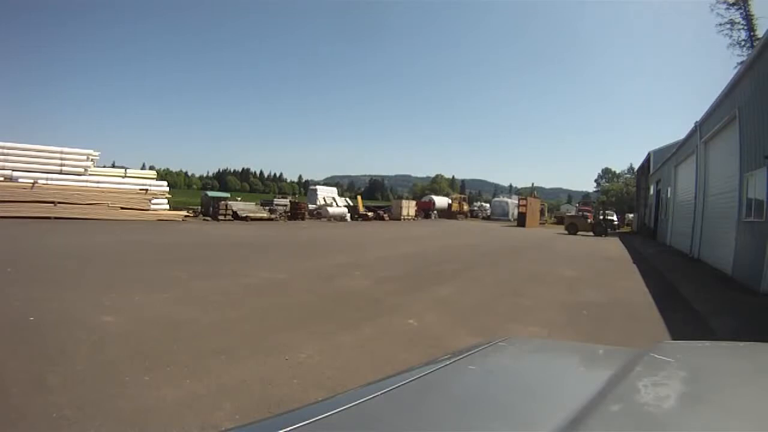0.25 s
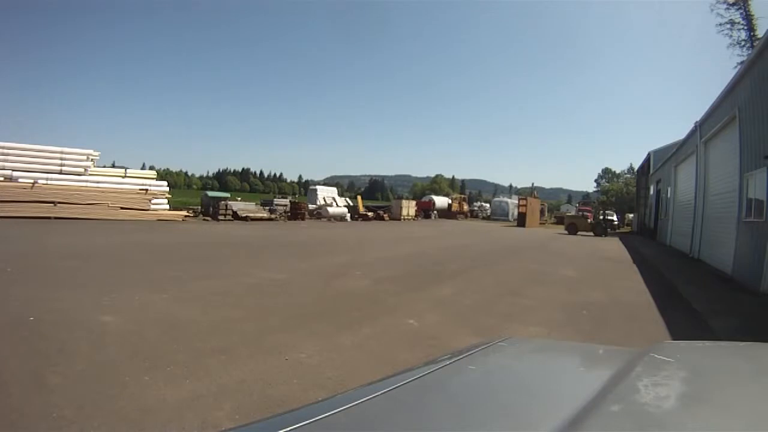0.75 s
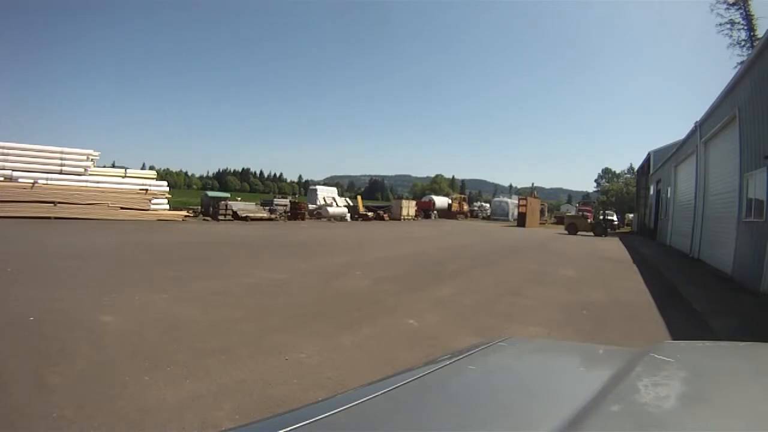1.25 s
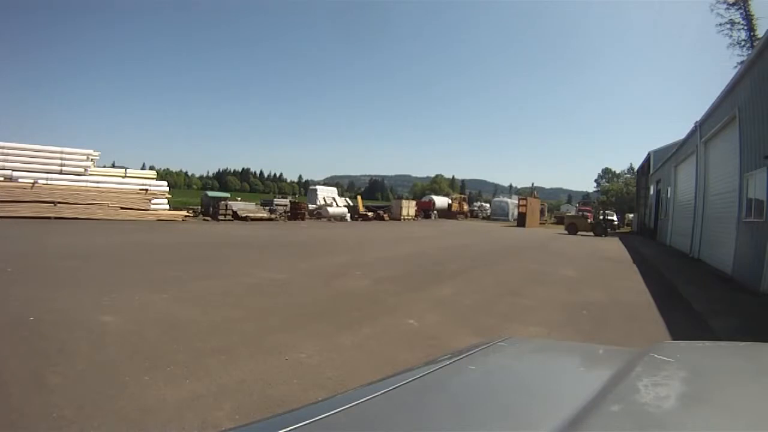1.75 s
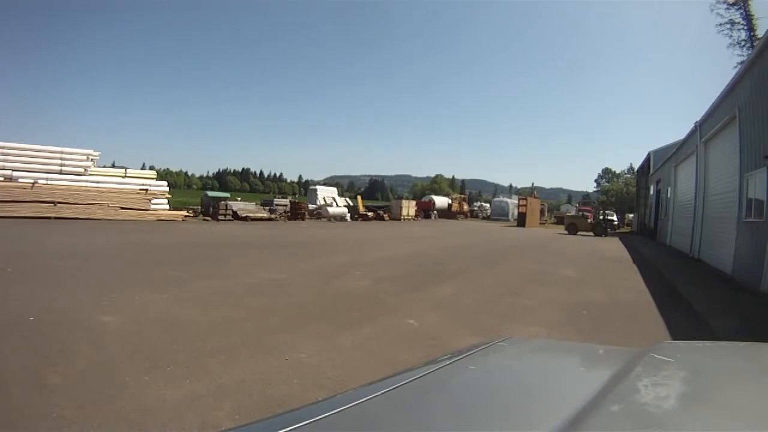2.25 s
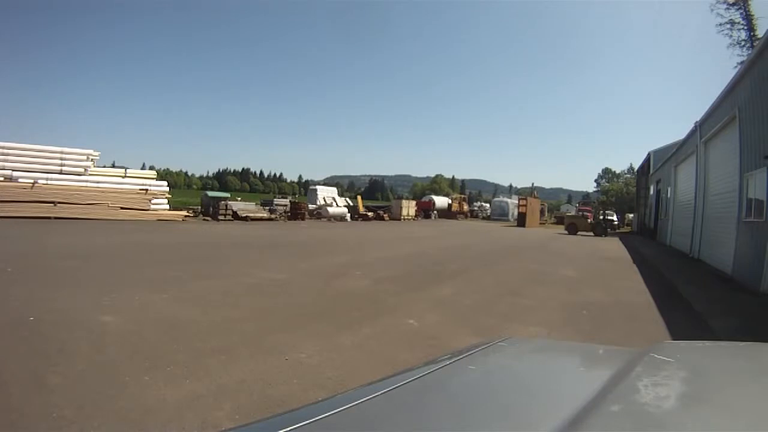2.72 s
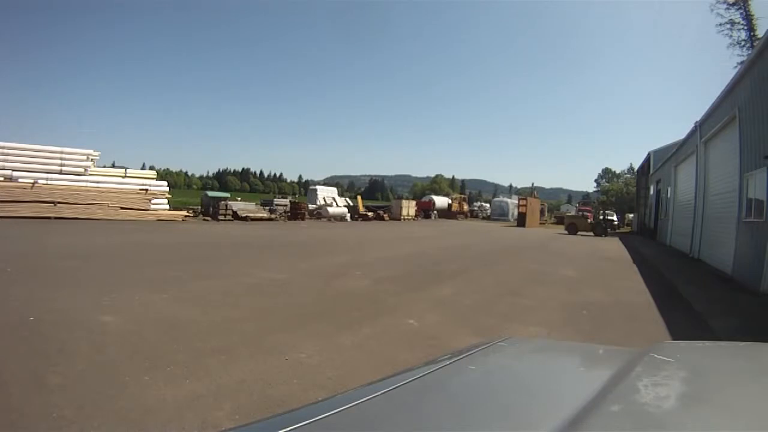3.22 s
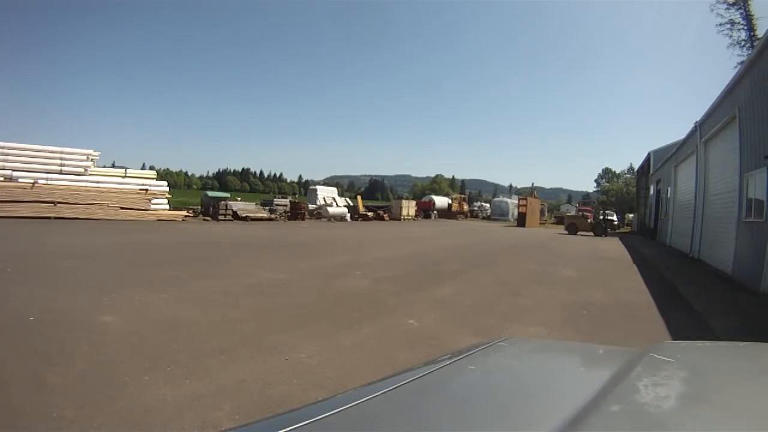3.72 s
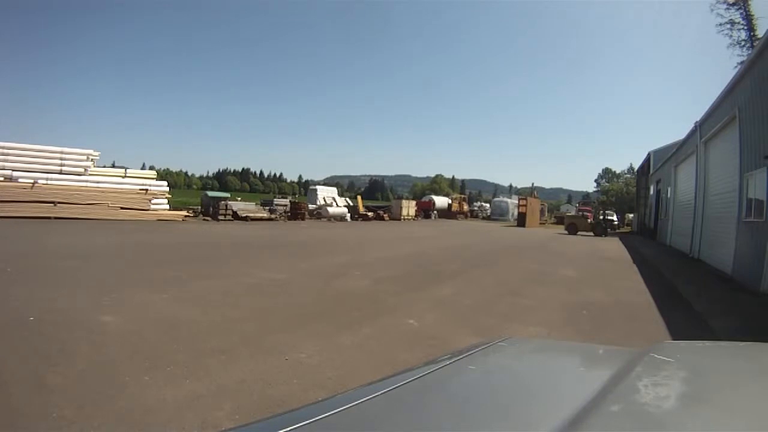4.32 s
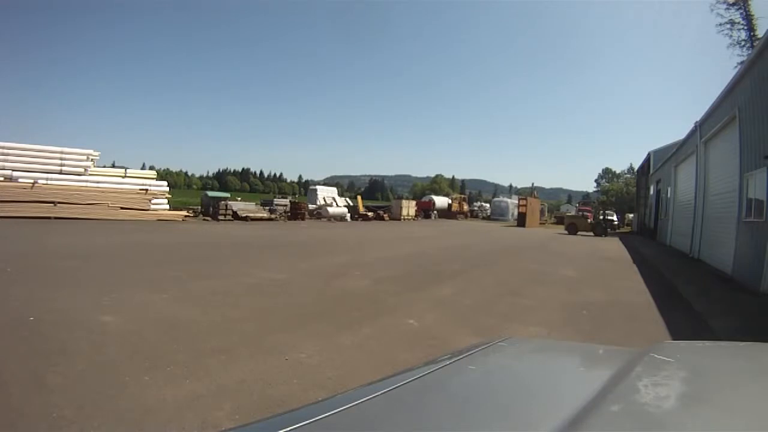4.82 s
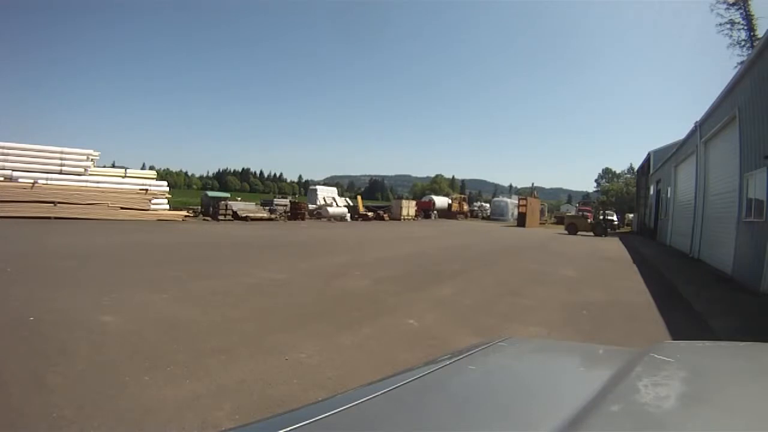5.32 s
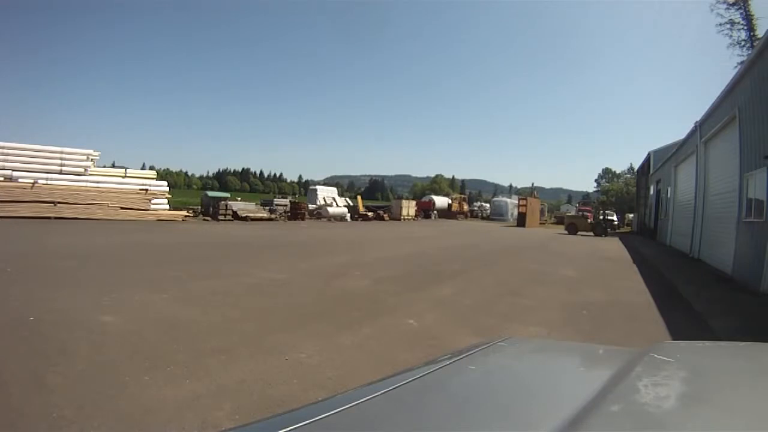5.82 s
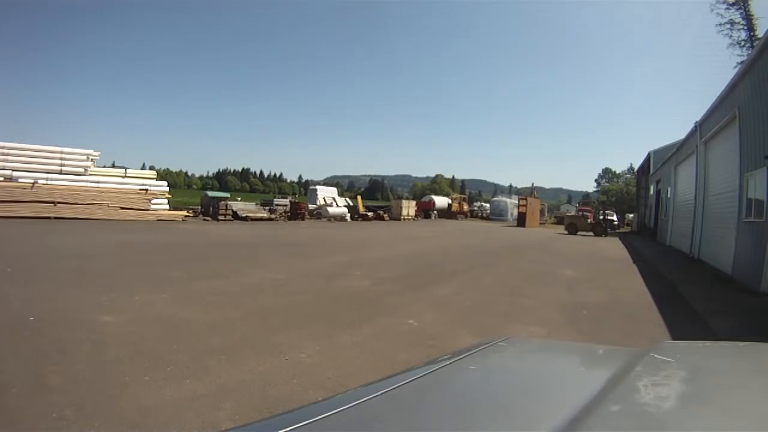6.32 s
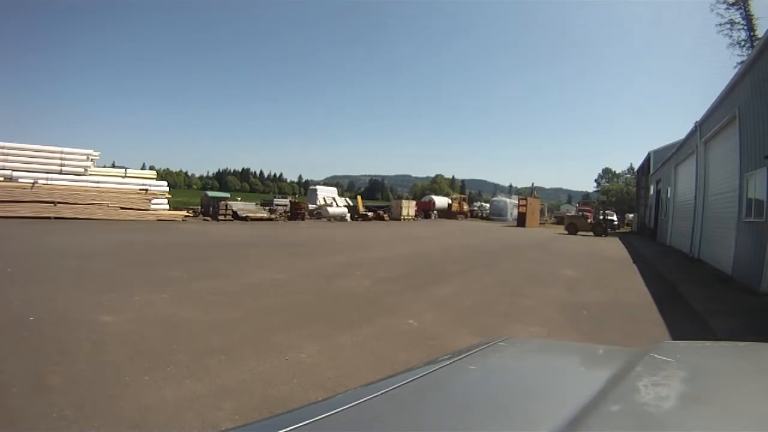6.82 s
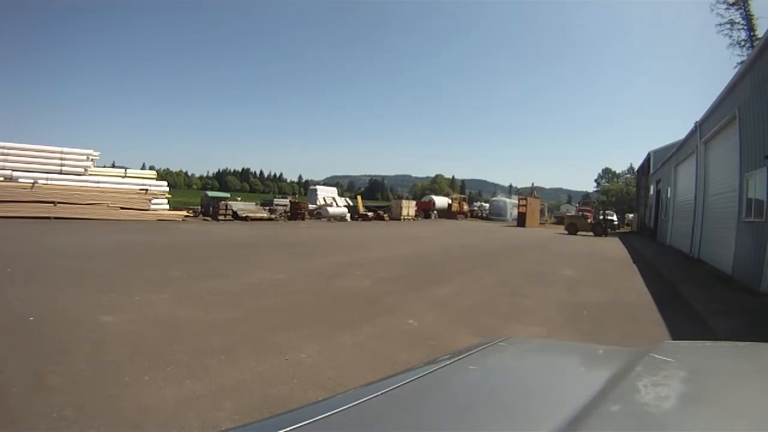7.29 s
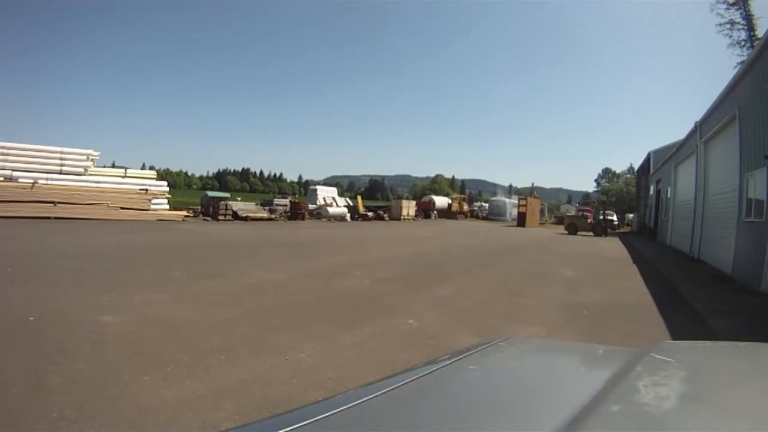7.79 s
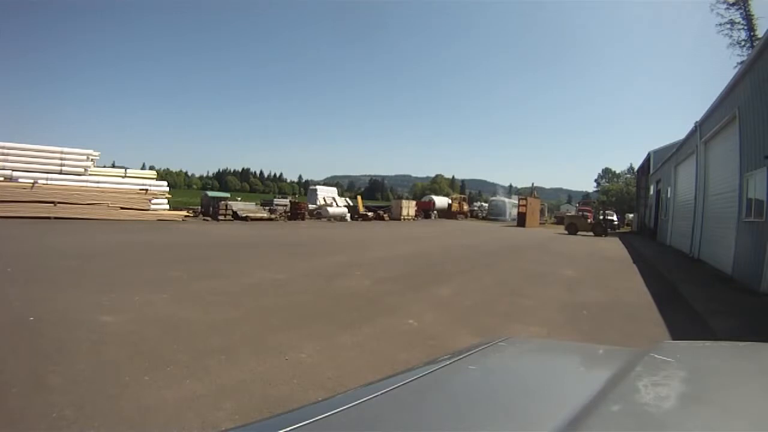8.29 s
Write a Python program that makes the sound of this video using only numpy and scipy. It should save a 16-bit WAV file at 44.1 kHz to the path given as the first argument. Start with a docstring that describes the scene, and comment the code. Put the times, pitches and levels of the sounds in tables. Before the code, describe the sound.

A big diesel engine coughs, catches with a loud bark, idles unevenly, then is revved twice through a raw open exhaust.

```python
"""A big six-cylinder diesel coughs and catches, hunts at idle and is revved twice, heard from a small camera on the bodywork.
The firing rate and two overtones boom in the open pipe; uneven cylinders add barking orders between and above them.
Gas hiss and combustion knock rasp once a firing, ringing the block, over a deep shaking of the bodywork.
A short starter whine rises among the first coughs, just before the catch; a panel sings as the engine coasts down.
The camera samples slowly and holds each sample, mirroring the sound up high."""
import sys
import numpy as np
from scipy import signal
from scipy.fft import rfft, irfft, next_fast_len
from scipy.io import wavfile
from scipy.ndimage import uniform_filter1d

SR = 44100
rng = np.random.default_rng(int(sys.argv[2]) if len(sys.argv) > 2 else 0)


def generate_wav(sig):
    """Save sig (samples, or channels by samples) to the path in sys.argv[1] as 16-bit PCM at SR."""
    pcm = np.round(np.clip(np.atleast_2d(sig).T, -1, 1) * 32767).astype(np.int16)
    wavfile.write(sys.argv[1], SR, pcm)


N = 377055

# Engine speed. Each row: time in seconds, firing rate in Hz.
FIRING_RATE = [(.3, 28.99), (.6, 53.5), (.72, 54.47), (1.2, 39.27), (1.45, 35.74), (1.75, 38.7),
               (2.1, 45.05), (2.3, 45.54), (2.75, 39.1), (2.85, 40.9), (3.08, 54), (3.25, 54.82),
               (3.57, 53.08), (3.8, 67.8), (4.1, 87.97), (4.4, 102.7), (4.7, 112.3), (4.82, 112.3),
               (5.3, 98.04), (5.5, 93.1), (6.05, 61.6), (6.33, 52.64), (6.45, 58.98), (6.8, 86.4),
               (7.0, 97.26), (7.11, 97), (7.4, 79), (7.7, 61.54), (8.1, 45.64), (8.4, 38.17), (8.55, 37.5)]
# How hard the engine burns. Each row: time in seconds, level of the rasp in dB before its treble shelf.
BURN_LEVEL = [(0, -59.5), (.1, -59.5), (.22, -51.5), (.24, -53.5), (.36, -41), (.57, -33.5), (.74, -45.5),
              (1.17, -50), (1.5, -47.5), (2.02, -43), (2.3, -45.5), (2.76, -48.5), (2.88, -42),
              (3.02, -35.5), (3.21, -42.5), (3.55, -42), (3.68, -34.5), (3.83, -30.5), (4.33, -30),
              (4.55, -33), (4.78, -38), (5.05, -34.5), (5.38, -32), (5.62, -37.5), (5.91, -44), (6.24, -46),
              (6.38, -35), (6.8, -29), (7.17, -34), (7.3, -41), (7.72, -44), (8.05, -47), (8.55, -47.5)]
# Separate burns around the catch. Each row: start in seconds, thud level in dB, knock level in dB.
FIRST_BURNS = [(.056, -29, -56), (0.12, -19, -47), (0.196, -37, -50), (0.231, -11, -35.5),
               (0.283, -17, -45.5), (0.316, -16, -36.5), (0.349, -10.5, -32), (.411, -25, -33.5)]
# Pipe and body panels as the orders meet them. Each row: frequency in Hz, gain in dB.
PIPE_RESPONSE = [(30, -21), (60, -22.5), (110, 9), (170, -2), (230, -5), (300, -9), (380, -12.5),
                 (410, -14), (450, -8), (560, -7.5), (690, -9.5), (760, -23)]
# Narrow body rings on top of the pipe. Each row: frequency in Hz, width in Hz, lift in dB.
BODY_RINGS = [(277, 27, 6), (356, 18, 12.5), (471.2, 7.3, 10.5), (510.7, 40, 6.5), (581, 7.8, 1.5),
              (680, 24, 5.5)]
# Block and panel resonances rung by the knock. Each row: frequency in Hz, width in Hz, relative gain in dB.
BLOCK_RESONANCES = [(800, 28.4, 2), (979, 113, 0.5), (1156, 67, 0.5), (1314, 47, 1), (1454, 46, -7),
                    (1620, 83, -2.5), (2146, 108, -6), (2300, 30, -1), (2892, 141, -9), (3323, 91, -7),
                    (4054, 47, -18.5), (4315, 460, -17.5), (5590, 210, -26.5)]
# Strength of each cylinder at idle. Each row: six cylinders in dB; the first row in the pipe, the second in the block.
CYLINDER_STRENGTH = [
    [0, 3, 1, -2, -1, -1],
    [0, 2, 1.5, .5, -1, -2],
]
# Orders 2 to 49 of the six-firing cycle at speed. Each entry: relative level in dB;
# orders 6, 12 and 18 are nearly silent here, for they boom on their own.
FAST_ORDERS = [-16, 4, 0, -23, -61, -27, -6, -8.5, -7, -10, -59, -31, -21, -7.5, 2.5, -14, -55, -32, 4.5,
               -1, 6.5, -35, -2, -15, -11.5, -12, 4, -12, -1, -0.5, -6, -13, 1, -21, 1, -23, -5, -11, -3.5,
               -9, -5, -1, -5.5, -16, -0.5, -17, -4, -22]
# The same orders at idle. Each entry: relative level in dB, by the order's remainder over six.
IDLE_ORDERS = [8.5, -12, -9, 2, -3.5, 0.5]
# What pipe and bodywork pass of a clean tone. Each row: frequency in Hz, rms level in dB before the tone laws.
TONE_RESPONSE = [(36, -54), (55, -44), (70, -36), (80, -33), (90, -38), (100, -31.5), (110, -22.5),
                 (122, -25.5), (140, -28), (160, -32), (185, -32), (200, -41), (220, -39.5), (245, -45.5),
                 (278, -32), (300, -41.5), (340, -37)]
# Firing tone, second, third. Each row: dB at idle, dB at speed, dB gained per dB of load, dB gained while coasting.
TONE_RULES = [(6.5, -1.5, 0.83, 1.3), (0.5, 4.5, 0.4626, 1.5), (-1.5, 0, 0.38, -0.5)]
# Lower and upper bark. Each row: dB at idle, dB gained per dB of load, dB gained at speed, extra dB while cold.
BARK_RULES = [(-40.5, 0.6616, 5.5, 4.5), (-37.5, 0.57, 6.5, 0)]
# Starter gears. The one row: start in seconds, end in seconds, first pitch in Hz, last pitch in Hz, level in dB.
STARTER_WHINE = (.15, .225, 1200, 1620, -58)

# speed and load
FLYWHEEL_S = .08  # the flywheel rounds each change of speed
IDLE_RASP_DB = -48  # load is counted in dB above this
COAST_HZ_PER_S = 55  # loss of firing rate with the throttle shut
CATCH_S, CRANK_DB = .235, -6  # before the catch the bark is quieter
COLD_S, COLD_FOR_S = 0.69, 0.14  # rich, loud burns just after the catch

# deep shaking of the bodywork, thinner at speed; a panel singing near one falling firing rate
RUMBLE_HZ, RUMBLE_DB, RUMBLE_PER_LOAD, RUMBLE_FAST_DB = 70.6, -46, 0.43, -6
PANEL_HZ, PANEL_AT_HZ, PANEL_SPAN_HZ, PANEL_DB = 1625, 68, 7, -55

# rasp: brighter under load, duller as the engine warms
BLOCK_BED_DB = -9
RATTLE_DB = 0.5  # each block resonance swells and fades on its own
SHINE_DB, SHINE_PER_LOAD, SHINE_DB_PER_S = 0.4, 0.16, -0.61

# bark
IDLE_FALL_DB = -0.23  # each order, at idle
ORDER_WAVER_DB = 3  # slow unsteadiness of each order
ROAR_IDLE_DB, ROAR_FAST_DB = -1, -12  # turbulent share against the orders
ROAR_BASS_DB = -5  # the roar's loss in the bass
THUMP_DB = -13  # knock on the body rings, against the upper bark
BARK_FLUTTER_DB = 1.36
# firing rate at which strong orders land on the lower body rings
CROSSING_HZ, CROSSING_WIDTH_HZ, CROSSING_DB = 96, 9.1, 3


def undb(db):
    """Turn decibels into a gain."""
    return 10 ** (np.asarray(db) / 20)


def unit(x):
    """Scale to rms 1."""
    return x / np.sqrt(np.mean(x ** 2))


def curves(table):
    """Columns of a table after its times, one value per sample."""
    s, *columns = np.transpose(table)
    return [np.interp(np.arange(N) / SR, s, c) for c in columns]


def walk(rate):
    """Random levels joined by ramps, rate a second."""
    knots = rng.standard_normal(int(N / SR * 60) + 2)
    return np.interp(np.arange(N) / SR * rate, np.arange(len(knots)), knots)


def colour(x, gain_at):
    """Filter by a gain given as a function of frequency."""
    size = next_fast_len(N)
    f = np.maximum(np.arange(size // 2 + 1) * SR / size, 1.)
    return irfft(rfft(x, size) * gain_at(f), size)[:N]


def steady(x, lo_hz, hi_hz):
    """Divide by the running rms of one band, so that a level curve sets it at any speed."""
    band = colour(x, lambda f: (f > lo_hz) * (f < hi_hz))
    power = uniform_filter1d(uniform_filter1d(band ** 2, 9000), 9000)
    return x / np.sqrt(power)


def revs(hz):
    """0 at idle, 1 when the engine runs fast."""
    return np.clip((hz - 48) / 30, 0, 1)


def coasting(hz):
    """0 while the engine holds or gains speed, 1 with the throttle shut."""
    return np.clip(-np.gradient(hz) * SR / COAST_HZ_PER_S, 0, 1)


def firings(hz, cycles, cylinder_db, scatter_db):
    """A gain held through each firing; every burn differs, and at idle the cylinders are uneven."""
    firing = (cycles - .1).astype(int)
    burn = rng.standard_normal(firing[-1] + 1)
    uneven_db = (1 - revs(hz)) * np.array(cylinder_db)[firing % 6]
    return undb(scatter_db * burn[firing] + uneven_db)


def burst(cycles, length):
    """A jump at each firing that dies away; length is in firing periods."""
    return np.exp(-((cycles - .1) % 1) / length)


def rumble(hz, load):
    """Unpitched shaking under the firing tone: low noise, stronger under load."""
    deep = colour(rng.standard_normal(N), lambda f: f / (1 + (f / RUMBLE_HZ) ** 6))
    level_db = RUMBLE_DB + RUMBLE_PER_LOAD * load + RUMBLE_FAST_DB * revs(hz) + 2.8 * walk(6)
    return undb(level_db) * unit(deep)


def starter():
    """Gears whine as they spin up: a short rising tone before the catch."""
    start, end, from_hz, to_hz, db = STARTER_WHINE
    along = np.clip((np.arange(N) / SR - start) / (end - start), 0, 1)
    hz = (from_hz + (to_hz - from_hz) * along) * (1 + .01 * walk(50))
    swell = np.sqrt(2 * np.abs(np.sin(np.pi * along)))
    return undb(db) * swell * np.sin(2 * np.pi * np.cumsum(hz) / SR)


def panel(hz):
    """A panel resonates in a short, thin, wavering tone when the falling speed meets it."""
    near = coasting(hz) * np.exp(-((hz - PANEL_AT_HZ) / PANEL_SPAN_HZ) ** 2)
    pitch_hz = PANEL_HZ * (1 + .006 * walk(30))
    tone = np.sin(2 * np.pi * np.cumsum(pitch_hz) / SR)
    return near * undb(PANEL_DB + 2.5 * walk(25)) * tone


def block_bed(hz):
    """Sloping response between the block resonances, falling away in the pipe's range."""
    return undb(BLOCK_BED_DB) * 1000 / (hz + 300) / (1 + (720 / hz) ** 10)


def block(x):
    """Knock rings each resonance of the block, and each takes a wavering share of it."""
    out = colour(x, block_bed)
    for k, (f, width, db) in enumerate(BLOCK_RESONANCES):
        struck = x * undb(RATTLE_DB * walk(30))
        ring = signal.lfilter(*signal.iirpeak(f, f / width, fs=SR), struck)
        out = out + (-1) ** k * undb(db) * ring  # alternate signs
    return unit(signal.sosfilt(signal.butter(4, 720, "high", fs=SR, output="sos"), out))


def coughs():
    """Single burns around the catch: a short low ring and a knock with a noisy tail."""
    thud, knock, t = np.zeros(N), np.zeros(N), np.arange(4000) / SR
    ring = (1 - np.exp(-t / 0.0011)) * np.exp(-t / 0.0039) * np.sin(2 * np.pi * 115 * t)
    tail = np.exp(-t / 0.019)
    for s, thud_db, knock_db in FIRST_BURNS:
        i = int(s * SR)
        thud[i:i + len(t)] -= undb(thud_db) * ring
        knock[i:i + len(t)] += undb(knock_db) * tail
    rung = block(knock * rng.standard_normal(N))
    return thud + rung * np.sqrt(np.mean(knock ** 2))


def rasp(hz, cycles, shine_db):
    """Gas hiss that jumps at each firing, roughened by sparse metal ticks, rings the block."""
    gate = (2.3 + burst(cycles, .15)) * firings(hz, cycles, CYLINDER_STRENGTH[1], 0.9)
    ticks = (rng.random(N) < .003) * undb(1.4 * rng.exponential(size=N)) * 0.62
    rung = block(gate * rng.standard_normal(N) * (1 + ticks))
    treble = colour(rung, lambda f: 1 / (1 + (2500 / f) ** 6))
    return rung + (undb(shine_db) - 1) * treble


def pipe(hz):
    """Gain of the pipe with the body rings on top, falling steeply outside its range."""
    table = np.array([(10, -70)] + PIPE_RESPONSE + [(1500, -60)])
    lift_db = sum(db / (1 + (2 * (hz - f) / width) ** 2) for f, width, db in BODY_RINGS)
    return undb(np.interp(np.log(hz), np.log(table[:, 0]), table[:, 1]) + lift_db)


def thump(hz, cycles):
    """One soft blow every six firings on the upper body rings, fading as the speed rises."""
    turn = ((cycles + 4.9) / 6).astype(int)
    size = undb(3.8 * rng.standard_normal(turn[-1] + 1))[turn]
    blows = np.diff(turn, prepend=0) * size * (1 - revs(hz))
    soft = signal.sosfilt(signal.butter(6, [420, 740], "band", fs=SR, output="sos"), blows)
    return sum(undb(db) * signal.lfilter(*signal.iirpeak(f, f / width, fs=SR), soft)
               for f, width, db in BODY_RINGS[2:])


def shaft_orders(hz, cycles):
    """Uneven cylinders sound sixths of the firing rate, each order weighed by the pipe."""
    orders, coarse = 0, hz[::64]  # slow curves are drawn every 64 samples
    at, knots = np.linspace(0, 59, len(coarse)), np.arange(60)
    for k, fast_db in enumerate(FAST_ORDERS, start=2):
        waver, wander = rng.standard_normal((2, 60))
        idle_db = fast_db if k in (6, 12, 18) else IDLE_ORDERS[k % 6] + IDLE_FALL_DB * k + 6
        db = idle_db + (fast_db - idle_db) * revs(coarse) + ORDER_WAVER_DB * np.interp(at, knots, waver)
        gain = np.repeat(pipe(k * coarse / 6) * undb(db), 64)[:N]
        drift = .25 * np.interp(at, knots, np.cumsum(wander)) + 2 * np.pi * rng.random()
        orders = orders + gain * np.sin(2 * np.pi * k * cycles / 6 + np.repeat(drift, 64)[:N])
    return orders


def roar(hz, cycles):
    """Turbulent gas puffs through the pipe at each firing."""
    puffs = (2.8 + burst(cycles, .5)) * firings(hz, cycles, CYLINDER_STRENGTH[0], 0.46)
    return colour(puffs * rng.standard_normal(N),
                  lambda f: pipe(f) * undb(ROAR_BASS_DB / (1 + (f / 300) ** 4)))


def bark_levels(hz, load):
    """The bark grows with load and speed, swells in its lower part while cold and flutters a little."""
    t = np.arange(N) / SR
    cold = np.exp(-((t - COLD_S) / COLD_FOR_S) ** 2)
    crank_db = CRANK_DB * (t < CATCH_S)
    low_db, high_db = [crank_db + idle + gain * load + fast * revs(hz) + rich * cold + BARK_FLUTTER_DB * walk(14)
                       for idle, gain, fast, rich in BARK_RULES]
    crossing_db = CROSSING_DB / (1 + (2 * (hz - CROSSING_HZ) / CROSSING_WIDTH_HZ) ** 2)
    return low_db + crossing_db, high_db


def bark(hz, cycles, low_db, high_db):
    """Shaft orders and turbulent roar from the pipe, levelled apart below and above 415 Hz."""
    roar_db = ROAR_IDLE_DB + (ROAR_FAST_DB - ROAR_IDLE_DB) * revs(hz)
    both = unit(shaft_orders(hz, cycles)) + undb(roar_db) * unit(roar(hz, cycles))
    low = colour(both, lambda f: f < 415)
    high = unit(both - low) + undb(THUMP_DB) * unit(thump(hz, cycles))
    return undb(low_db) * steady(low, 230, 415) + undb(high_db) * steady(high, 415, 750)


def tone_levels(hz, load):
    """Each tone is as loud as the pipe passes its pitch, shifted by speed, load and coasting."""
    f, db = np.transpose(TONE_RESPONSE)
    levels = []
    for k, (idle, fast, gain, shut) in enumerate(TONE_RULES, start=1):
        passed_db = np.interp(np.log(k * hz), np.log(f), db)
        levels.append(passed_db + idle + (fast - idle) * revs(hz) + gain * load + shut * coasting(hz))
    return levels


def boom(cycles, tones_db):
    """The open pipe sounds the firing tone and two overtones, nearly clean."""
    out = 0
    for k, db in enumerate(tones_db):
        phase = 2 * np.pi * (k + 1) * cycles + 0.07 * walk(7.9) + k
        out = out + np.sqrt(2) * undb(db + walk(16)) * np.sin(phase)  # flutters by about 1 dB
    return out


def scene():
    """One speed curve and one load curve drive every layer of the running engine."""
    t = np.arange(N) / SR
    hz = uniform_filter1d(curves(FIRING_RATE)[0], int(FLYWHEEL_S * SR))
    load = curves(BURN_LEVEL)[0] - IDLE_RASP_DB
    cycles = np.cumsum(hz) / SR  # firings so far
    background = rumble(hz, load) + starter() + panel(hz) + coughs()
    shine_db = SHINE_DB + SHINE_PER_LOAD * load + SHINE_DB_PER_S * t
    knocking = undb(IDLE_RASP_DB + load) * rasp(hz, cycles, shine_db)
    barking = bark(hz, cycles, *bark_levels(hz, load))
    running = np.clip((t - .3) / 0.054, 0, 1)  # the boom fades in
    booming = running * boom(cycles, tone_levels(hz, load))
    return (background + knocking + barking + booming)[None]


def record(dry):
    """Soft overload, then 12000 samples a second, each held for four ticks of a 48000 clock, top cut."""
    driven = np.tanh(1.115 * dry) / 1.04
    soft = signal.sosfilt(signal.butter(10, 5500, fs=SR, output="sos"), driven)
    soft = signal.sosfilt(signal.butter(2, 30, "high", fs=SR, output="sos"), soft)  # small capsule, no deep bass
    slow = signal.resample_poly(soft, 40, 147, axis=1)
    held = signal.resample_poly(np.repeat(slow, 4, axis=1), 147, 160, axis=1)[:, :N]
    return signal.sosfilt(signal.ellip(14, .5, 80, 15310, fs=SR, output="sos"), held)


dry = scene()
out = record(dry)
generate_wav(out)
```